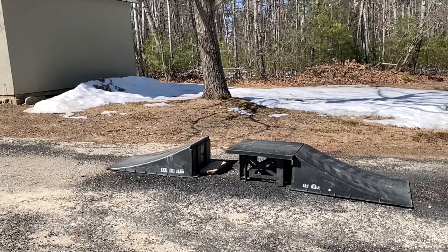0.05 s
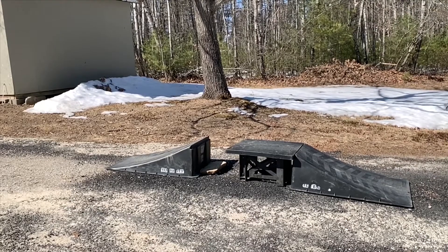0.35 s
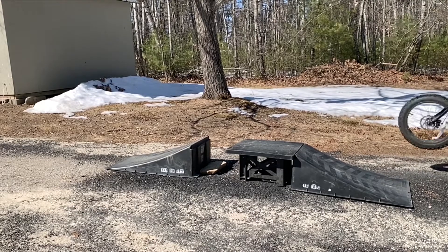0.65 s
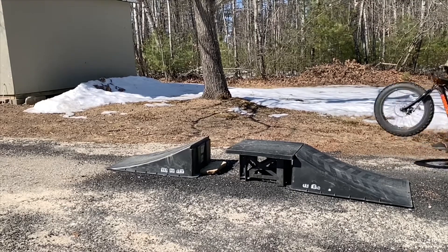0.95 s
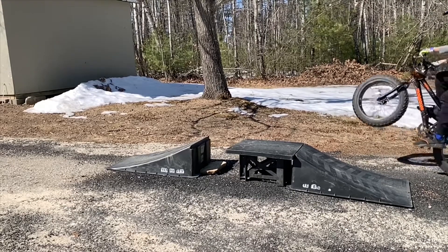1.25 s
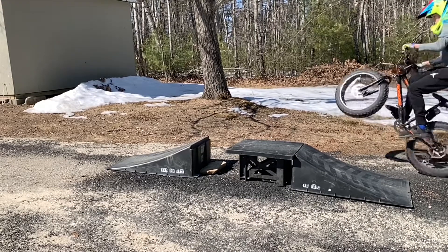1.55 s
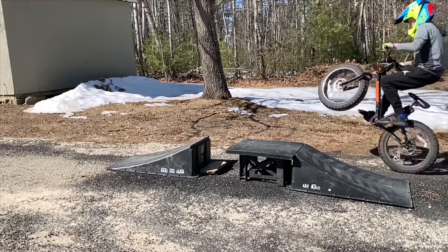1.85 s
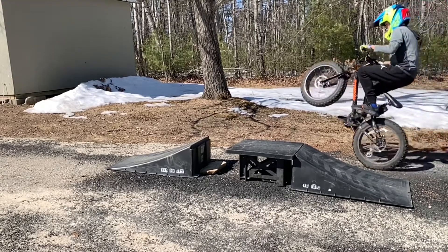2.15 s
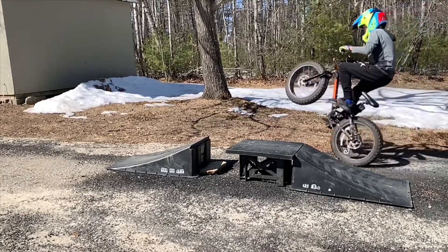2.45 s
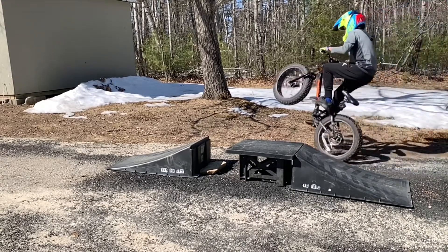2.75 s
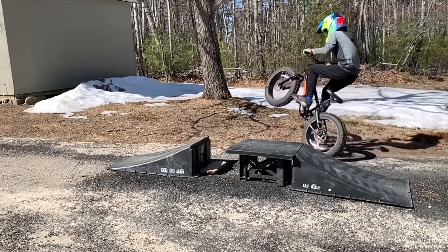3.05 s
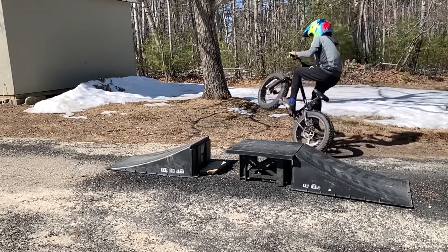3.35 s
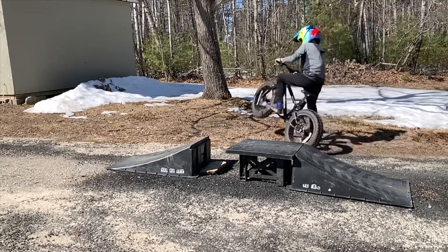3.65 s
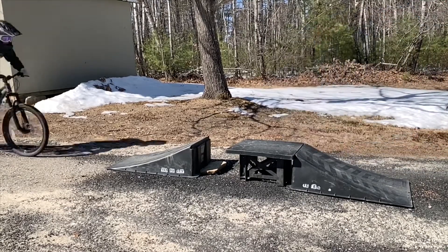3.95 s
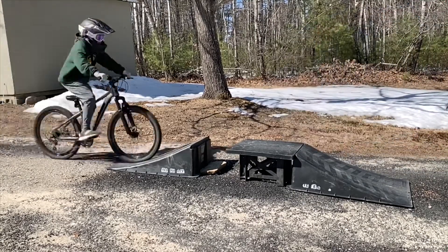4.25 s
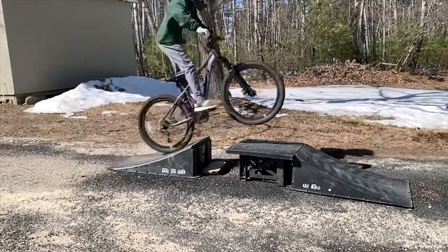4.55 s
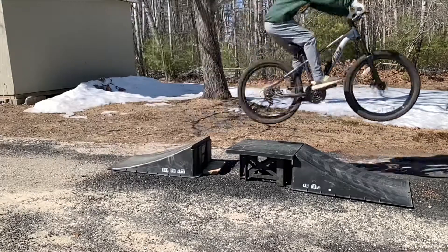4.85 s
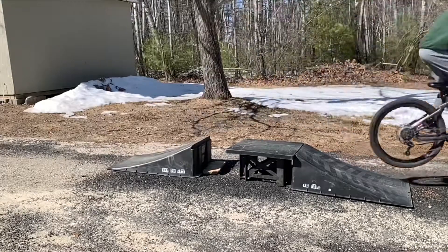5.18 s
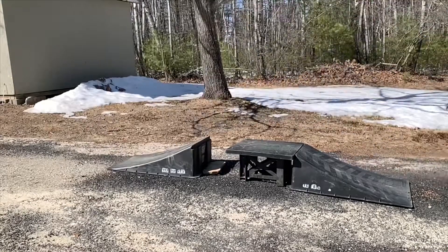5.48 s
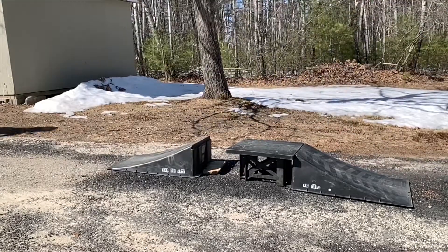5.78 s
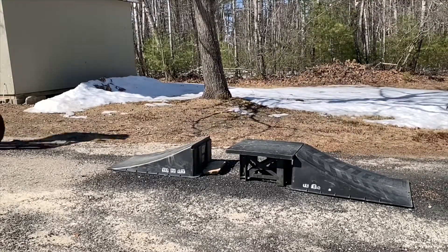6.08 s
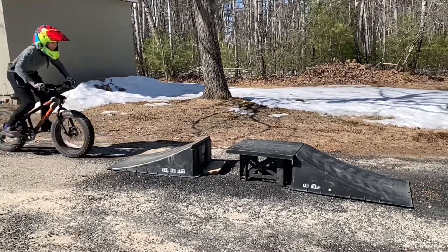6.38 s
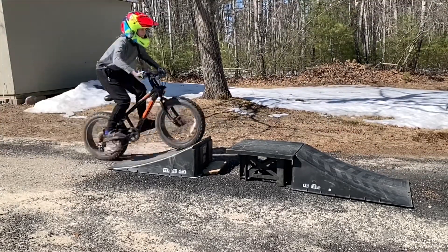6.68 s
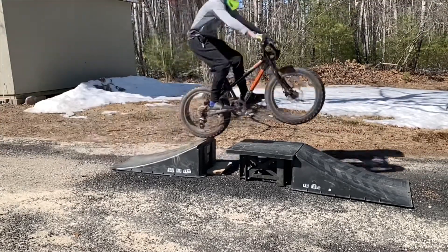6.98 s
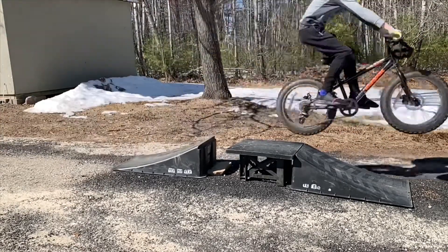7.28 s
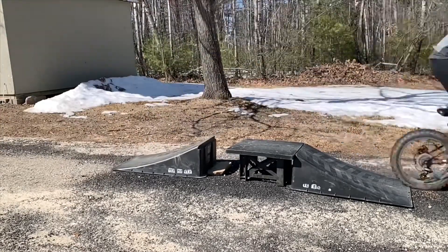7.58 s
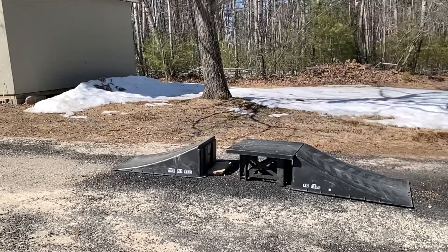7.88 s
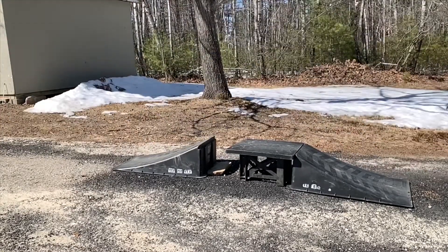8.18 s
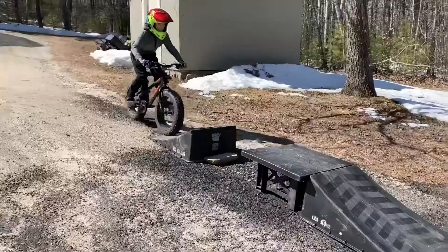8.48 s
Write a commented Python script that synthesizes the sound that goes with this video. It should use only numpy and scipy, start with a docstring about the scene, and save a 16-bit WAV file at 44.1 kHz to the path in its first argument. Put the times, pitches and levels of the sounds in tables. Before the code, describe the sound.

For the first 3.6 seconds a bicycle tyre rolls over gravel in slow motion, quiet and at first muffled. Stones crackle and snap, with brief thin squeaks, a few dull bumps and low wind rumble on the microphone. Then the sound turns brighter and runs at full speed. Tyres crunch in from the left, and from about 4 to 4.5 seconds the wheels boom and clatter over a hollow plastic ramp. The freewheel ticks in the air, and just after 5 seconds the bike lands softly on the right with chain rattle. A second run swells from 5.6 seconds, hits the ramp harder between 6.3 and 6.9, ticks through the jump and lands with a heavier thud at 7.4, rolling away ticking. A third run strikes the ramp loudly around 8.4 seconds and cuts off. The outdoor yard gives faint, short echoes.

```python
"""Bicycles on gravel: a slow-motion wheelie, then three runs at a hollow plastic ramp; five shots.
In the wheelie, stones crackle and snap under the tyre, with thin squeaks, dull bumps and wind rumble.
At full speed the tyres crunch up, each wheel makes the ramp boom and clatter, and the freehub pawls tick.
Two jumps land with a tyre thud and chain rattle. Each run crosses left to right, with faint yard echoes."""
import sys
import numpy as np
from scipy import signal
from scipy.fft import rfft, irfft
from scipy.io import wavfile
from scipy.ndimage import uniform_filter1d, map_coordinates

SR = 44100
rng = np.random.default_rng(int(sys.argv[2]) if len(sys.argv) > 2 else 0)


def pcm_store(signal):
    """Save signal as 16-bit PCM."""
    levels = np.round(np.clip(np.atleast_2d(signal), -1, 1) * 32767)
    wavfile.write(sys.argv[1], SR, levels.astype(np.int16).T)


N = 376173
T = np.arange(N) / SR

# shots, first two in slow motion (start [s], end [s], treble limit [Hz])
SHOTS = [(-.02, .357, 2500), (.408, 3.644, 6400), (3.658, 5.558, 13000), (5.558, 8.222, 12900),
         (8.234, 8.56, 15700)]
# back tyre on gravel in the wheelie (time [s], level [dB])
WHEELIE_LEVELS = [(0, -47), (.45, -49.5), (1.3, -52), (1.52, -46.5), (1.85, -53), (3.0, -52), (3.63, -54.5)]
# tyre grinding into loose gravel (time [s], decay [s], level [dB])
GRINDS = [(.074, .01, -33), (.103, 0.016, -32), (0.164, 0.063, -37), (.301, 0.015, -27.5),
          (1.36, 0.023, -41.5), (1.45, 0.046, -43.5), (2.73, 0.042, -46), (3.5, 0.041, -45.5)]
# slow tyre: first shot, approaching, turning away (frequency [Hz], level [dB])
SLOWEST_SPECTRUM = [(88, -3), (150, -9), (399, -16.5), (599, -11.5), (708, -12.5), (1610, -9),
                    (2390, -22.5), (2600, -46), (3380, -64), (5720, -120)]
NEAR_SPECTRUM = [(53, -28), (90, -6), (138, 2.5), (340, -3.5), (459, -15.5), (702, -11), (900, -17.5),
                 (1150, -16), (1300, -7), (1930, -28), (2220, -16), (3340, -15), (3580, -14), (6200, -19.5),
                 (8060, -88), (13600, -120)]
AWAY_SPECTRUM = [(53, -47), (90, 2), (183, 3.5), (251, -4.5), (558, -4.5), (1000, -10.5), (1300, -21),
                 (1700, -10.5), (2140, -24.5), (2700, -14), (3780, -22), (4200, -21.5), (6200, -23.5),
                 (8060, -80), (13600, -120)]
# wind on the microphones (frequency [Hz], level [dB])
WIND_SPECTRUM = [(8.8, -38), (15, 7.5), (39, -5.5), (47, -32), (59, -9), (70, -33.5), (110, -33),
                 (140, -35), (240, -120)]
# gusts (start [s], end [s], level [dB])
GUSTS = [(0, 0.294, -36.5), (1.34, 1.4, -44), (1.618, 1.67, -45.5), (2.09, 2.56, -40)]
# loudest stone snaps (time [s], level [dB])
STONE_SNAPS = [(.073, -22.5), (.238, -43), (.303, -35), (1.368, -38.5), (1.752, -41), (1.953, -43),
               (2.154, -46), (2.291, -43.5), (2.335, -48), (2.419, -47.5), (2.526, -51), (2.722, -42.5),
               (3.147, -39.5), (3.169, -48), (3.514, -45)]
# squeaks (time [s], length [s], start pitch [Hz], end pitch [Hz], peak [dB])
SQUEAKS = [(.442, 0.024, 4100, 4490, -32), (.498, 0.017, 3930, 3880, -38), (0.8, 0.04, 3490, 3640, -38.5),
           (0.999, 0.024, 5750, 6170, -42.5), (1.23, 0.076, 3550, 4170, -44),
           (1.526, 0.035, 6100, 5730, -45), (1.587, .025, 5750, 6000, -45),
           (2.931, 0.035, 5320, 5370, -48.5), (2.966, 0.083, 4400, 4060, -50),
           (3.112, 0.027, 3900, 4150, -50), (3.41, .032, 4900, 5030, -50.5)]
# back-wheel bumps (time [s], level [dB], low cut [Hz])
BUMPS = [(0.609, -45, 203), (0.719, -51, 200), (1.361, -53, 180), (1.46, -52, 180), (1.557, -48, 115),
         (2.73, -36.5, 242), (3.489, -50, 225)]
# run-ups, levels at the ramp
# (start [s], back wheel at ramp [s], crunch [dB], grit [dB], hub ticking [dB], crunch swell [dB/s])
RUN_UPS = [(3.644, 4.24, -37.5, -42.5, -53, 27), (5.546, 6.536, -32.5, -49, -54.5, 16.4),
           (8.23, 8.423, -31.5, -44.5, -61, 1)]
# tread drumming up the ramp (front wheel on [s], back wheel off [s], level [dB])
CLIMBS = [(3.98, 4.394, -33), (6.295, 6.876, -29.5), (8.254, 8.506, -29.5)]
# rolling away (touch-down [s], crunch [dB], fade [dB/s])
ROLL_OUTS = [(5.062, -43.5, 27.5), (7.36, -45, 4)]
# tread hum, gravel crunch, fine grit (frequency [Hz], level [dB])
TREAD_SPECTRUM = [(13, -35), (22, 1), (43, 1.5), (65, 5), (92, -8), (118, -3.5), (284, -8.5), (481, -12),
                  (521, -11.5), (550, -17.5), (720, -40), (1210, -120)]
CRUNCH_SPECTRUM = [(260, -10), (450, -5.5), (700, -3.5), (1000, -1), (1400, -2.5), (2100, -12.5),
                   (2600, -21.5), (3500, -18), (5000, -48)]
GRIT_SPECTRUM = [(1500, 2.5), (2500, 7), (3700, -0.5), (5200, 2), (7000, -0.5), (8700, -2.5), (10200, -0.5),
                 (12500, -7.5), (15600, -5)]
# freehub speed, one list per coasting spell (time [s], rate [teeth/s])
COASTING_SPELLS = [
    [(3.68, 56), (3.96, 56)],
    [(4.322, 57.5), (4.72, 31), (4.92, 39), (5.06, 27)],
    [(5.351, 43), (5.54, 57)],
    [(5.61, 49.5), (6.29, 51)],
    [(6.86, 33.7), (7.04, 33.7), (7.15, 41.5), (7.35, 41.7)],
    [(7.719, 34), (7.97, 52), (8.2, 52)],
]
# freehub ticks, one entry per spell (level [dB])
TICK_LEVELS_DB = [-44, -36, -37.5, -50, -38, -40.5]
# steel tick (frequency [Hz], level [dB])
TICK_SPECTRUM = [(1470, -71), (2500, -24), (2920, -1), (3270, -12), (3630, -8.5), (4960, 3.5), (5950, -1.5),
                 (8660, -4.5), (9490, 2.5), (10700, -2), (11600, -5.5), (12300, 3), (13500, -23)]
# hub and sprocket modes (frequency [Hz], level [dB], t60 [s])
HUB_MODES = [(4900, -2, 0.016), (5390, -7.5, 0.0091), (5820, 0, 0.018), (6090, -1.5, 0.017),
             (8500, 1.5, 0.012), (8680, -5.5, 0.061), (10340, -6.5, 0.062)]
# ramp shell modes (frequency [Hz], level [dB], t60 before added damping [s])
RAMP_MODES = [(53, 4.5, 0.99), (70.7, -1, 0.95), (90.9, 11, 0.21), (117.4, -5.5, 0.65), (138, 0.5, 0.33),
              (164.5, 2.5, 0.2), (185, 2, 0.12), (226.8, 2, 0.34), (274.4, 5, 0.13), (321.2, -1.5, 0.22),
              (355, -2, 0.073), (413, -1, 0.15), (455, -1.5, 0.052), (585, -11, 0.082), (650, -12, 0.095),
              (753, -10, 0.053), (884, -10.5, 0.04), (933, -16.5, 0.093), (1006, -12.5, 0.04),
              (1210, -15.5, 0.043), (1326, -16, 0.054), (1540, -12.5, 0.02), (1970, -9, 0.0073),
              (2370, -17, 0.018)]
# wheels striking the ramp (time [s], rise [s], boom decay [s], heave [dB], boom [dB])
RAMP_BLOWS = [(3.969, 0.0079, .045, -45, -20), (3.999, 0.0053, .03, -16.5, -21.5),
              (4.176, 0.0022, 0.025, -11, -12.5), (4.203, 0.015, 0.012, -10.5, -9.5),
              (4.237, 0.00075, .009, -6, -17), (4.29, 0.0114, .07, -23.5, -31.5),
              (4.499, 0.0052, .034, -22.5, -27), (6.297, 0.0139, .06, -36, -13),
              (6.367, 0.0029, 0.033, -11.5, -22), (6.405, 0.019, 0.029, -23, -21),
              (6.484, .033, 0.015, -11, -6.5), (6.526, 0.00714, 0.016, -6, -3),
              (6.597, 0.0034, .05, -19, -22), (6.747, 0.0037, 0.019, -8, -15.5),
              (6.798, .0012, 0.012, -7, -12), (6.841, 0.0024, 0.009, -8.5, -28),
              (6.949, 0.0046, 0.035, -21, -31.5), (8.271, 0.018, .15, -39, -16.5),
              (8.385, 0.012, .018, -20, -12), (8.4223, 0.0016, 0.019, -13, -2.5),
              (8.449, 0.0055, 0.025, -8, -21.5)]
# ramp rim hitting the ground (time [s], peak [dB])
RIM_SLAMS = [(3.971, -25), (4.179, -15), (4.237, -13), (6.298, -21.5), (6.369, -20.5), (6.534, -14),
             (6.601, -17), (6.8, -15.5), (8.4245, -23)]
# chain hitting the frame (time [s], level [dB], decay [s])
CHAIN_SLAPS = [(3.97, -30.5, 0.0076), (4.177, -40, 0.011), (4.2044, -27.5, .015), (4.2359, -31.5, 0.009),
               (5.163, -29.5, 0.011), (5.2025, -25.5, 0.0078), (5.3117, -36.5, .007), (5.4668, -30, 0.0028),
               (5.4778, -32, 0.0029), (5.889, -44, .003), (6.297, -24, .005), (6.5085, -24.5, 0.0071),
               (6.524, -24, 0.01), (6.5966, -32, 0.0062), (6.755, -34.5, .006), (6.7984, -34.5, .007),
               (7.3539, -22.5, 0.0036), (7.522, -29, 0.0056), (7.5715, -32.5, 0.0056),
               (7.588, -34.5, 0.0095), (7.6346, -30.5, 0.0028), (8.256, -35, .005), (8.3914, -24, 0.0053),
               (8.425, -27.5, 0.0025), (8.4509, -24.5, 0.0067)]
# chain slap (frequency [Hz], level [dB])
CHAIN_SPECTRUM = [(600, -18), (1300, -0.5), (2200, -4), (3300, 0), (5000, -4), (8000, -4.5), (12000, -10.5),
                  (15600, -17)]
# tyres landing (time [s], rise [s], thud and crunch decay [s], thud [dB], knock [dB], crunch [dB])
LANDINGS = [(5.056, 0.007, 0.03, -36, -33, -44), (5.114, 0.011, 0.06, -36, -32.5, -33),
            (5.16, 0.0045, 0.013, -29, -25.5, -31), (5.205, 0.0081, 0.04, -28, -30.5, -31),
            (7.355, 0.0033, 0.046, -11.5, -26.5, -60), (7.399, 0.0053, 0.0092, -15, -46.5, -53),
            (7.43, 0.0016, 0.024, -15, -18, -32.5), (7.473, 0.0028, 0.048, -22.5, -33, -37)]
# tyre thud; fork and rim knock (frequency [Hz], level [dB])
THUD_SPECTRUM = [(30, -6), (55, -16), (90, 4), (135, -6.5), (180, -0.5), (230, -5), (310, -14.5),
                 (390, -14), (600, -19.5), (1500, -40.5)]
KNOCK_SPECTRUM = [(300, -9), (480, 0.5), (750, -2), (1100, -1.5), (1600, -7.5), (2400, -37), (5000, -33)]
# left-to-right passes (straight ahead at [s], speed [m/s])
PASSES = [(4.2, 3.17), (6.402, 2.72), (8.4, 1.1)]
# yard echo (frequency [Hz], level [dB])
ECHO_SPECTRUM = [(40, -3), (200, -6), (700, -2.5), (2500, 4), (6000, 1), (9000, -5), (15000, -21)]

SLOW_END_S = SHOTS[1][1]


def undb(db):
    """Decibels to gain."""
    return 10 ** (np.asarray(db) / 20)


def unit(x):
    """Scale to unit energy."""
    return x / np.sqrt(np.sum(x ** 2) + 1e-20)


def add(out, s, x):
    """Mix x into out from time s."""
    i = max(int(s * SR), 0)
    out[i:i + len(x)] += x[:max(len(out) - i, 0)]


def band(x, hz, kind, order=2):
    """Butterworth filter."""
    return signal.sosfilt(signal.butter(order, hz, kind, fs=SR, output="sos"), x)


def shot_at(s):
    """True throughout the shot that holds time s."""
    start, end, _ = next(shot for shot in SHOTS if s < shot[1])
    return (T >= start) & (T < end)


def envelope(start_s, end_s, release_s, attack_s=0.0093):
    """Linear attack, hold, exponential release."""
    return np.clip((T - start_s) / attack_s, 0, 1) * np.exp(-np.maximum(T - end_s, 0) / release_s)


def walk(rate_hz):
    """Smoothed random steps; spread near 1."""
    hold = int(SR / rate_hz)
    steps = np.repeat(rng.standard_normal(N // hold + 1), hold)
    return 1.3 * uniform_filter1d(uniform_filter1d(steps, hold), hold)[:N]


def response(spectrum, size=4096):
    """Minimum-phase ring with the given spectrum; unit energy."""
    hz, db = np.transpose(spectrum)
    log_hz = np.log(np.arange(size // 2 + 1) * SR / size + 1)
    gain = undb(np.interp(log_hz, np.log(hz), db, left=db[0] - 15.5, right=db[-1] - 13.5))
    cepstrum = irfft(np.log(gain))
    cepstrum[1:size // 2] *= 2
    cepstrum[size // 2 + 1:] = 0
    return unit(irfft(np.exp(rfft(cepstrum))))


def modal(modes):
    """Decaying sines of a struck body; unit energy."""
    t = np.arange(SR // 3) / SR
    return unit(sum(undb(db - 60 * t / t60_s) * np.sin(2 * np.pi * hz * t) * (-1) ** k
                    for k, (hz, db, t60_s) in enumerate(modes)))


def grains(size, rate_hz, spread_db):
    """Random tiny impacts, a few much harder than the rest; rms 1."""
    count = max(int(size * min(rate_hz / SR, 1)), 2)
    force = undb(spread_db * np.minimum(rng.exponential(size=count), 4)) * rng.choice([-1, 1], count)
    return unit(np.bincount(rng.integers(0, size, count), force, size)) * np.sqrt(size)


def stream(ring, db, rate_hz, spread_db):
    """Continuous shower of impacts into a resonant body."""
    return signal.oaconvolve(grains(N, rate_hz, spread_db) * undb(db), ring)[:N]


def burst(ring, rise_s, decay_s, db, rate_hz=5000, spread_db=2):
    """One contact: chatter builds, dies away and rings a body."""
    t = np.arange(int((rise_s + 6 * decay_s) * SR) + 2) / SR
    force = np.minimum(t / rise_s, 1) * np.exp(-np.maximum(t - rise_s, 0) / decay_s)
    sound = signal.fftconvolve(force * grains(len(t), rate_hz, spread_db), ring)
    return unit(sound) * np.sqrt(np.sum(force ** 2)) * undb(db)


def wheelie(turn_s=1.776, turn_length_s=0.3):
    """Slowed gravel under the back tyre: uneven crackle that dulls as the bike turns away."""
    grinding = sum(undb(db) * envelope(s, s, decay_s) for s, decay_s, db in GRINDS)
    rolling_db = np.interp(T, *np.transpose(WHEELIE_LEVELS)) + 3.25 * walk(25.19)
    tyre_db = 20 * np.log10(np.hypot(undb(rolling_db), grinding))
    turned = np.clip((T - turn_s) / turn_length_s, 0, 1)
    near = stream(response(NEAR_SPECTRUM), tyre_db, rate_hz=2200, spread_db=2.9)
    away = stream(response(AWAY_SPECTRUM), tyre_db - 1, rate_hz=2200, spread_db=3.7)
    slowest = stream(response(SLOWEST_SPECTRUM), tyre_db, rate_hz=1200, spread_db=2.6)
    turning = np.sqrt(1 - turned) * near + np.sqrt(turned) * away
    tyre = np.where(T < SHOTS[0][1], slowest, turning)
    return tyre * (T < SLOW_END_S) + pebbles(tyre_db - 3.5 - 3 * turned)


def wind(base_db=-42.5, flutter_db=2.5):
    """Air buffets the microphones: deep gusty rumble, slow motion only."""
    gusts = sum(undb(db) * envelope(start, end, release_s=0.037) for start, end, db in GUSTS)
    level_db = 20 * np.log10(undb(base_db) + gusts) + flutter_db * walk(7)
    rumble = stream(response(WIND_SPECTRUM, size=16384), level_db, rate_hz=3000, spread_db=0)
    return rumble * (T < SLOW_END_S)


def stones(small_count=24):
    """Stones snap from under the slow tread: listed loud ones, random small ones."""
    out, stone = np.zeros(N), unit(band(response(AWAY_SPECTRUM), 950, "high"))
    small_s = rng.uniform(0, SLOW_END_S, small_count)
    small_db = rng.normal(-53, 4, small_count)
    for s, db in [*STONE_SNAPS, *zip(small_s, small_db)]:
        add(out, s, burst(stone, .001, .005, db, rate_hz=3000))
    return out


def pebbles(level_db, count=1300):
    """Second shot: each pebble pings at its own pitch, as hard as the tyre presses."""
    out, t = np.zeros(N), np.arange(SR // 60) / SR
    start_s, end_s, _ = SHOTS[1]
    for when, pitch, ring, hardness in rng.random((count, 4)):
        s = start_s + when * (end_s - start_s)
        hz = 1200 + 4000 * pitch
        decay_s = .0007 + .0025 * ring
        db = level_db[int(s * SR)] - 3 * np.log(1.02 - hardness)
        add(out, s, undb(db) * np.exp(-t / decay_s) * np.sin(2 * np.pi * hz * t))
    return out


def squeaks():
    """Short unsteady glides, as from a feathered brake."""
    out = np.zeros(N)
    for s, length_s, start_hz, end_hz, db in SQUEAKS:
        n = int(length_s * SR)
        waver = unit(uniform_filter1d(rng.standard_normal(n), size=60)) * np.sqrt(n)
        hz = np.linspace(start_hz, end_hz, n) * (1 + 0.02 * waver)
        add(out, s, undb(db) * np.hanning(n) * np.sin(2 * np.pi * np.cumsum(hz) / SR))
    return out


def bumps():
    """Light back-wheel bumps hardly flex the casing: thuds without deep bass."""
    out, tyre = np.zeros(N), response(THUD_SPECTRUM)
    for s, db, low_hz in BUMPS:
        add(out, s, burst(unit(band(tyre, low_hz, "high")), 0.0287, 0.018, db))
    return out


def rolling_levels(leave_db_per_s=137, grit_swell_share=0.55):
    """Hum, crunch, grit, hub ticking [dB]: swell on the run-up, drop in the air, return on landing."""
    hum, crunch, grit, hub = ([np.full(N, undb(floor_db))] for floor_db in (-51, -55, -64.5, -64.5))
    for start_s, ramp_s, crunch_db, grit_db, hub_db, swell_db_per_s in RUN_UPS:
        far_db = -swell_db_per_s * np.maximum(ramp_s - T, 0)
        on_gravel = (T > start_s) * undb(-leave_db_per_s * np.maximum(T - ramp_s, 0))
        hum.append(on_gravel * undb(crunch_db + far_db - 1))
        crunch.append(on_gravel * undb(crunch_db + far_db))
        grit.append(on_gravel * undb(grit_db + far_db * grit_swell_share))
        hub.append(on_gravel * undb(hub_db + far_db * grit_swell_share))
    for on_s, off_s, db in CLIMBS:
        drumming = undb(db) * envelope(on_s, off_s, release_s=0.058)
        hum.append(drumming)
        crunch.append(drumming * undb(-14))  # gravel carried onto the ramp
        grit.append(drumming * undb(-18.5))
    for down_s, db, fade_db_per_s in ROLL_OUTS:
        away = shot_at(down_s) * (T > down_s) * undb(db - fade_db_per_s * np.maximum(T - down_s, 0))
        tyre_squash = envelope(down_s, down_s, release_s=0.23)
        spray = away * (undb(-13.5) + undb(1) * tyre_squash)
        hum.append(away * (undb(6) + undb(10) * tyre_squash))
        crunch.append(away)
        grit.append(spray)
        hub.append(spray * undb(-2))
    return [20 * np.log10(np.linalg.norm(parts, axis=0)) for parts in (hum, crunch, grit, hub)]


def rolling(hum_db, crunch_db, grit_db, hub_db):
    """Full speed: tread knobs hum, gravel crunches, grit spits; faint steely ticking from the hub."""
    hum = stream(response(TREAD_SPECTRUM, size=8192), hum_db, rate_hz=1500, spread_db=0.74)
    crunch = stream(response(CRUNCH_SPECTRUM), crunch_db, rate_hz=1200, spread_db=3.15)
    grit = stream(response(GRIT_SPECTRUM), grit_db, rate_hz=9000, spread_db=5.4)
    hub_ticking = stream(hub_ring(), hub_db, rate_hz=500, spread_db=3.7)
    return (hum + crunch + grit + hub_ticking) * (T > SLOW_END_S)


def hub_ring(sprocket_db=-3.5):
    """Steel tick plus the short ring of the sprockets."""
    tick = response(TICK_SPECTRUM, size=2048)
    return unit(tick + undb(sprocket_db) * modal(HUB_MODES)[:len(tick)])


def freehub(pawl_lag_s=0.0028, second_pawl_db=-5.5):
    """Two pawls drop off each tooth, slightly apart, and ring the hub."""
    out, hub = np.zeros(N), hub_ring()
    for db, spell in zip(TICK_LEVELS_DB, COASTING_SPELLS):
        t = np.arange(spell[0][0], spell[-1][0], 1 / SR)
        teeth_per_s = np.interp(t, *np.transpose(spell))
        tooth = np.floor(np.cumsum(teeth_per_s) / SR)
        for s in t[np.diff(tooth, prepend=-1) > 0]:
            tooth_db = rng.normal(db, 1.5)
            add(out, s, burst(hub, 0.00055, 0.0031, tooth_db, rate_hz=13000))
            second_s = s + pawl_lag_s * rng.uniform(0.9, 1.2)
            add(out, second_s, burst(hub, .0005, .0039, tooth_db + second_pawl_db, rate_hz=13000))
    return out


def ramp(damping_s=.06):
    """The shell heaves, its panels boom under the tread, its rim clatters and slams on the ground."""
    out, t = np.zeros(N), np.arange(SR // 3) / SR
    shell = modal(RAMP_MODES) * np.exp(-t / damping_s)
    heave = unit(band(shell, [38, 118], "band", order=3))
    boom = unit(band(shell, [122, 470], "band", order=3))
    clatter = unit(band(shell, 510, "high", order=4))
    for s, rise_s, decay_s, heave_db, boom_db in RAMP_BLOWS:
        add(out, s, burst(heave, rise_s, decay_s * .73, heave_db))
        add(out, s, burst(boom, rise_s, decay_s, boom_db))
        add(out, s, burst(clatter, rise_s, decay_s * 1.25, boom_db - 11, rate_hz=600, spread_db=6.5))
    slam = clatter * np.exp(-t / 0.014)  # the bike's weight damps the shell
    for s, db in RIM_SLAMS:
        add(out, s, undb(db) * slam / np.abs(slam).max())
    return out


def chain_rattle(link_count=5):
    """The chain slaps the frame; a few links clink at each slap."""
    out, slap = np.zeros(N), response(CHAIN_SPECTRUM)
    for s, db, decay_s in CHAIN_SLAPS:
        links = modal([(hz, 0, .03) for hz in 1500 * 7 ** rng.random(link_count)])
        add(out, s, burst(slap, 0.00058, decay_s, db, rate_hz=5400, spread_db=5.5))
        add(out, s, burst(links, .0005, decay_s, db - 2.5, rate_hz=2000))
    return out


def landings():
    """Soft tyres thud, fork and rims knock, grit sprays."""
    out, thud, knock = np.zeros(N), response(THUD_SPECTRUM), response(KNOCK_SPECTRUM)
    gravel = unit(response(CRUNCH_SPECTRUM) + undb(-4) * response(GRIT_SPECTRUM))
    for s, rise_s, decay_s, thud_db, knock_db, crunch_db in LANDINGS:
        add(out, s, burst(thud, rise_s, decay_s, thud_db))
        add(out, s, burst(knock, rise_s, decay_s * 0.37, knock_db, rate_hz=1300))
        add(out, s, burst(gravel, rise_s, decay_s, crunch_db, rate_hz=2400, spread_db=3))
    return out


def pass_by(bike, distance_m=4.06, lag_ms=0.72, pan_db=7, left_bias_db=3, split_hz=3600):
    """Lows and mids reach the far microphone later and weaker; treble and wheelie stay centred."""
    along_m = sum(shot_at(s) * m_per_s * (T - s) for s, m_per_s in PASSES)
    side = along_m / np.hypot(along_m, distance_m)  # -1 left, 1 right
    balance_db = left_bias_db * (T > SLOW_END_S) - pan_db * side
    low = signal.sosfiltfilt(signal.butter(8, split_hz, fs=SR, output="sos"), bike)
    treble = bike - low
    low_left = map_coordinates(low, [np.arange(N) - lag_ms * side * SR / 1000], order=3)
    return np.array([low_left, low]) * undb(np.array([balance_db, -balance_db]) / 2) + treble


def yard_echoes(x, t60_s=0.14, gap_s=.008):
    """Scattered echoes from wall and trees, different on each side."""
    t = np.arange(SR // 2) / SR
    tail = undb(-60 * t / t60_s) * (t > gap_s)
    reflections = [tail * grains(len(t), rate_hz=4000, spread_db=3.2) for _ in range(2)]
    rings = [unit(signal.fftconvolve(side, response(ECHO_SPECTRUM))) for side in reflections]
    return np.array([signal.oaconvolve(x, ring)[:N] for ring in rings])


def scene():
    """Stereo mix: passing bike, wide scatter of gravel and chain, echoes, wind."""
    levels_db = rolling_levels()
    impacts = ramp() + landings() + bumps() + chain_rattle() + stones()
    bike = impacts + freehub() + squeaks() + wheelie() + rolling(*levels_db)
    # fresh draws in opposite polarity add width
    loose = undb(-4.5) * rolling(*levels_db) + undb(0.5) * wheelie()
    loose += undb(-3.5) * (chain_rattle() + stones())
    scatter = band(loose, [400, 6000], "band", order=1) * np.array([[1], [-1]])
    return pass_by(bike) + scatter + undb(-15) * yard_echoes(bike) + wind()


def record(dry, ceiling=.95, fade_s=0.029, top_hz=15750):
    """Soft clip, fades and low-pass per shot, overall low-pass."""
    rounded = dry / (1 + (dry / ceiling) ** 4) ** .25
    out = 0
    for start_s, end_s, shot_top_hz in SHOTS:
        fade = np.clip(np.minimum(T - start_s, end_s - T) / fade_s, 0, 1)
        lowpass = signal.ellip(10, .2, 80, shot_top_hz, fs=SR, output="sos")
        out = out + signal.sosfilt(lowpass, rounded * fade + 1e-18)
    return signal.sosfilt(signal.ellip(8, .2, 70, top_hz, fs=SR, output="sos"), out)


dry = scene()
out = record(dry)
pcm_store(out)
```